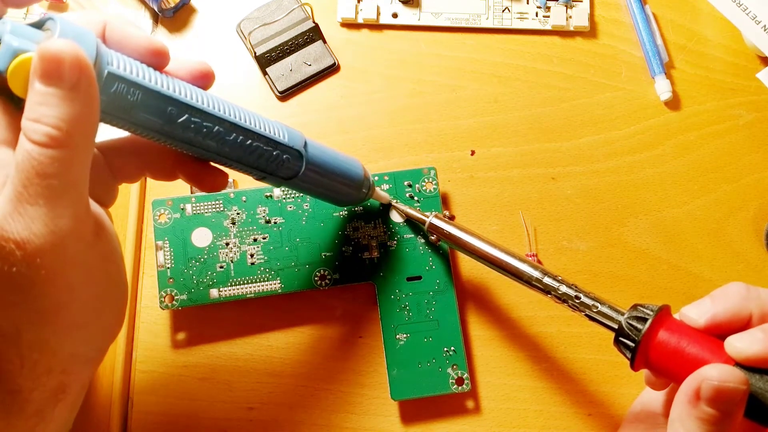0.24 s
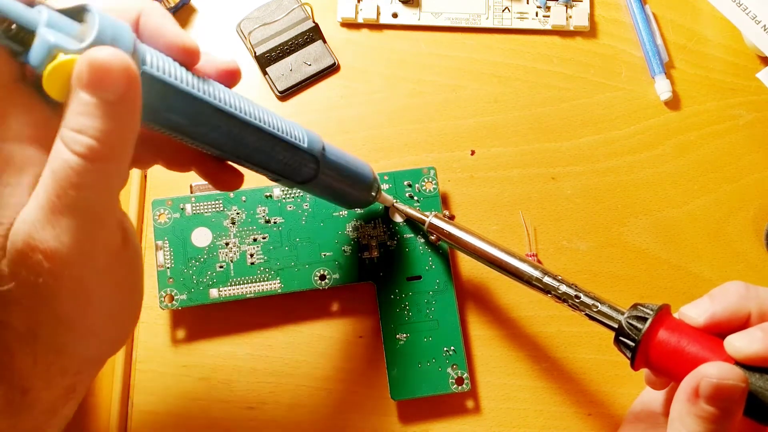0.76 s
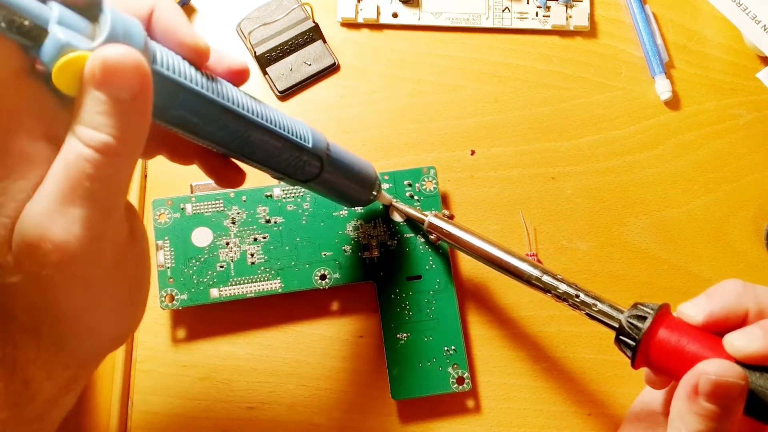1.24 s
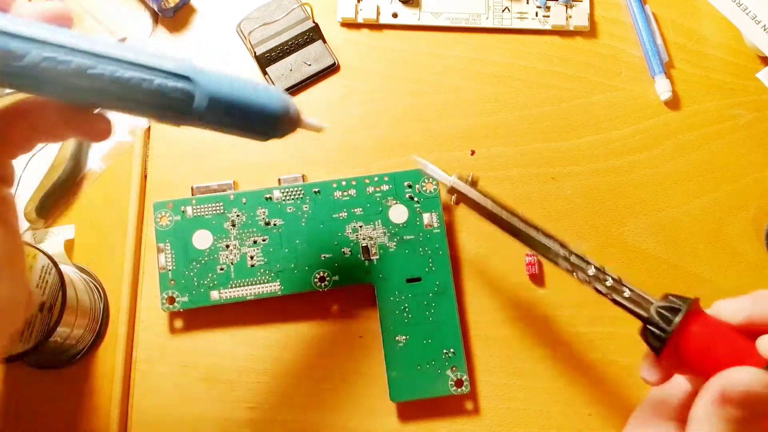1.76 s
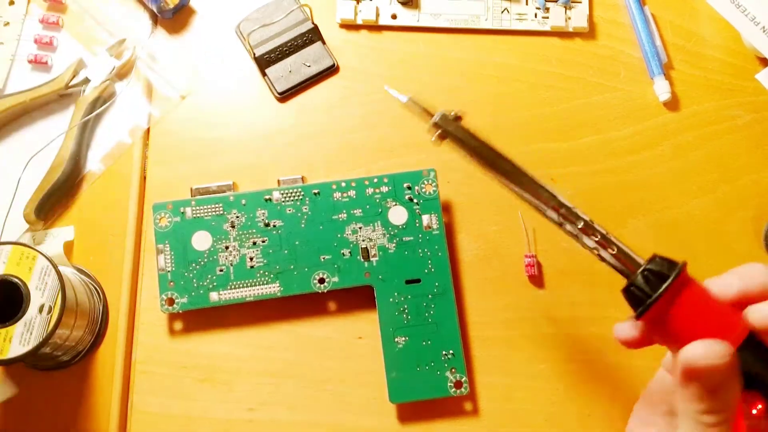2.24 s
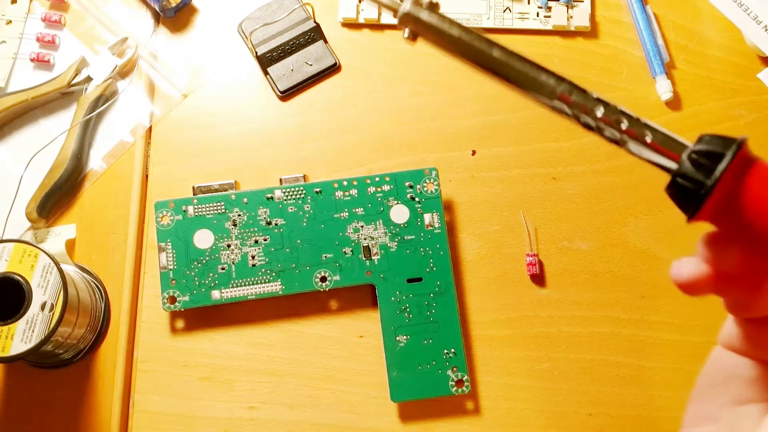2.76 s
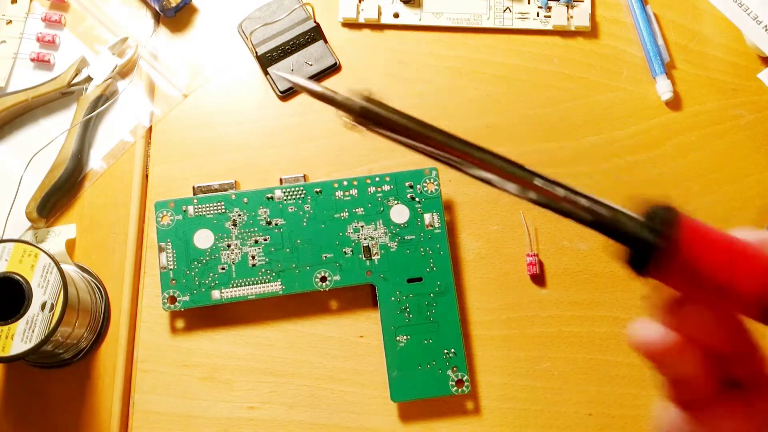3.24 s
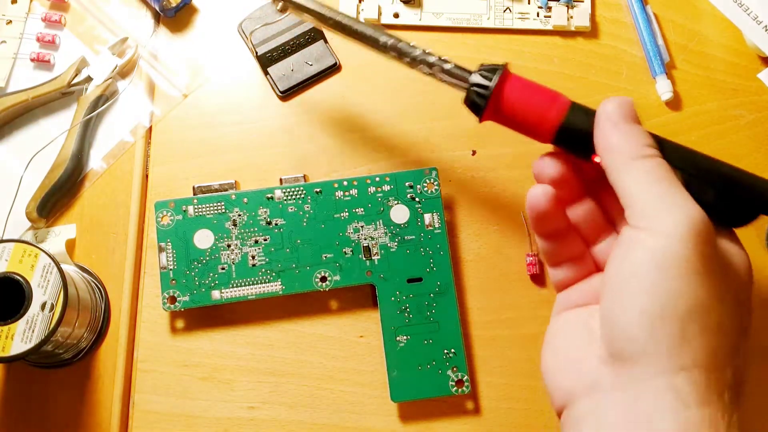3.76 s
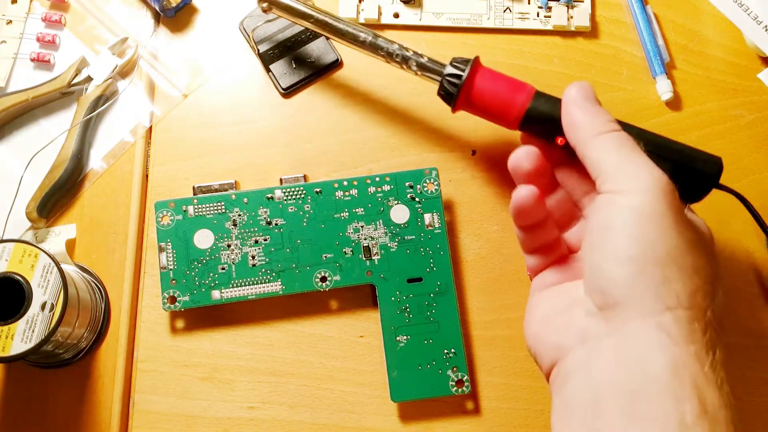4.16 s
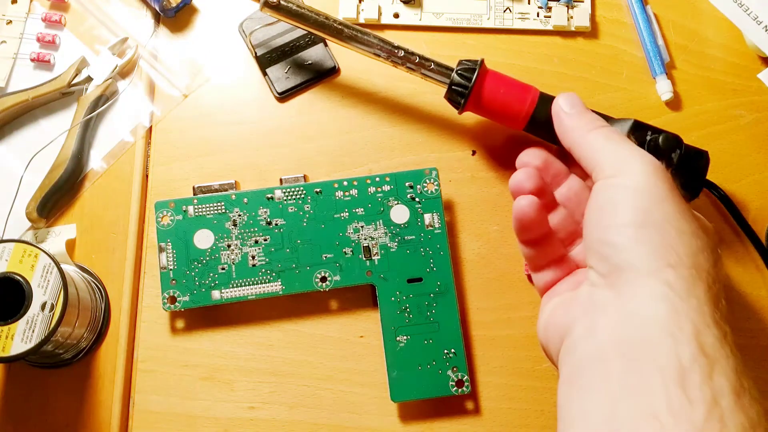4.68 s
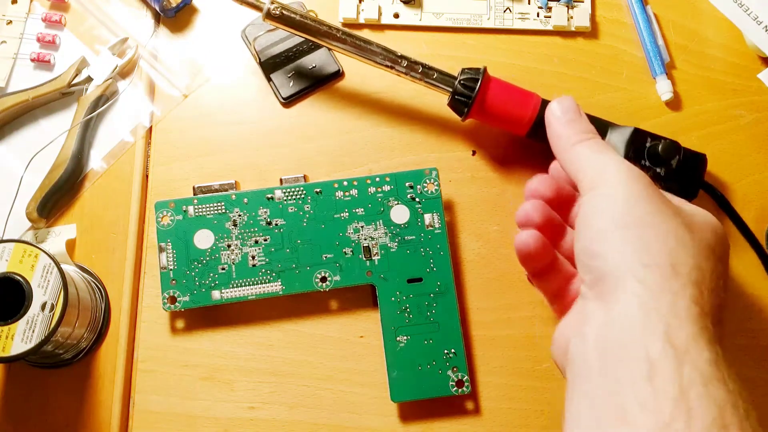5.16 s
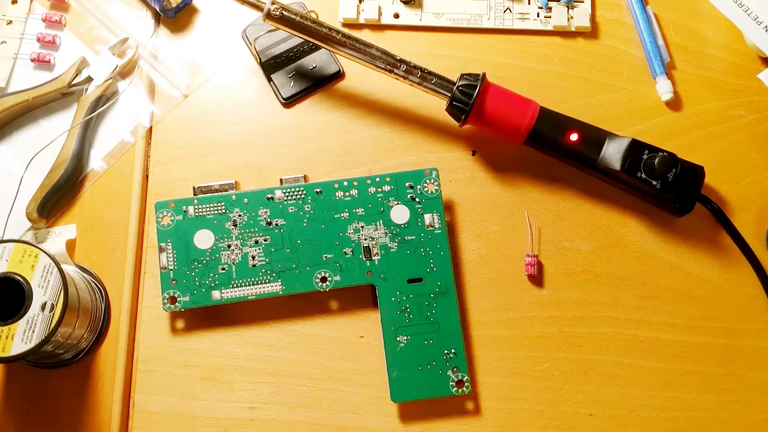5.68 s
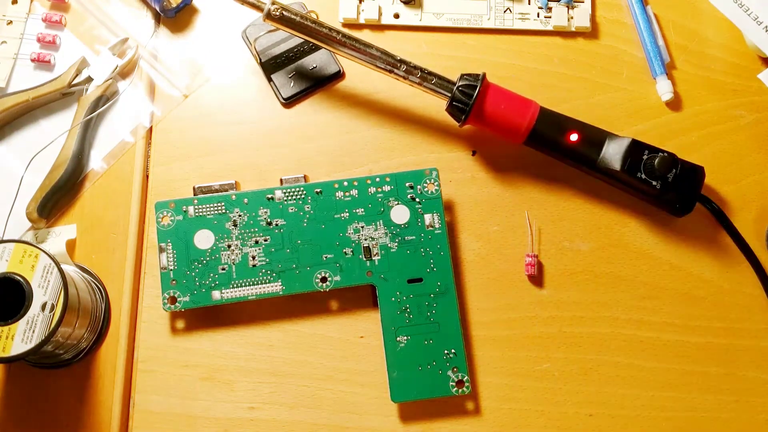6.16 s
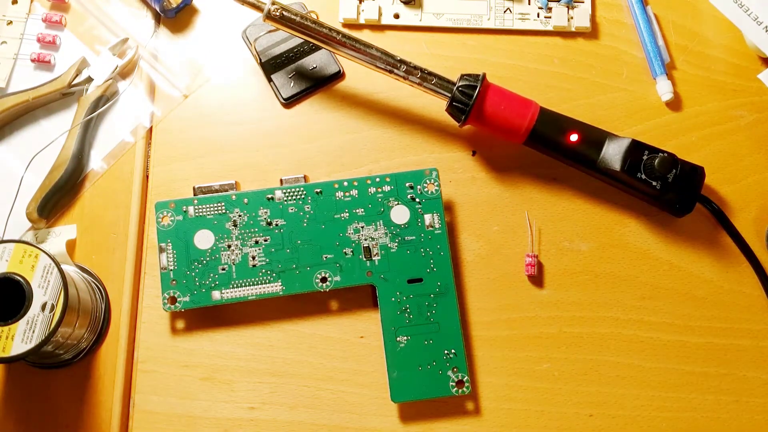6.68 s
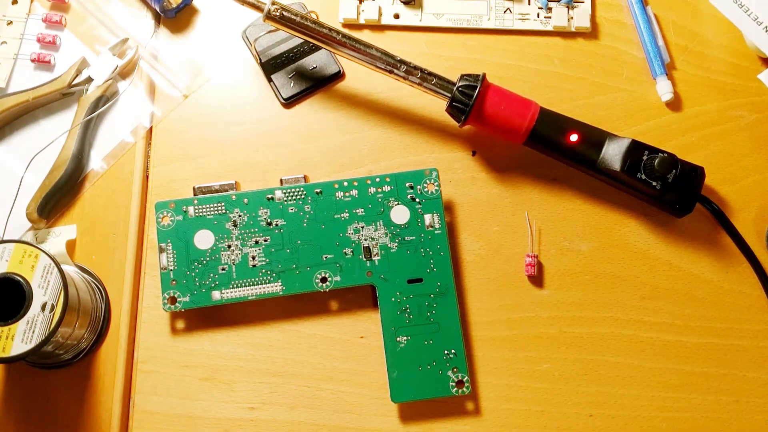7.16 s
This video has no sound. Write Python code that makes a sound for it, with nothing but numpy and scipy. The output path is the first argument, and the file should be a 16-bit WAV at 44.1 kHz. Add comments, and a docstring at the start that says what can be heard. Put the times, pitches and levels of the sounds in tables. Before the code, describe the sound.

Close, dry stereo pickup over a wooden workbench. First a bright double-edged clack from a solder pump, then thin board taps alternating in pitch and slowing to stillness. Faint rustle follows, then two metal clinks and a cluster of scraping knocks as an iron is laid down, ending with lower handle thuds. A lull, then uneven tool rummaging on the right and a piercing snap. Soft room hiss and a very high whine remain underneath.

```python
"""Over quiet room air with a thin whine, a solder pump clacks and a circuit board rocks to rest on a desk.
A soldering iron is then laid on its sheet-metal rest; to the right a hand shuffles tools and something snaps.
Blows are short noise rattles that ring the struck object and the wooden desk; sliding is dull and grainy noise.
The snap is a few dying sine waves. A short room tail follows, and two microphones above the desk hear it all."""
import sys
import numpy as np
from scipy import signal
from scipy.fft import rfft, irfft, next_fast_len
from scipy.io import wavfile
from scipy.ndimage import uniform_filter1d

SR = 44100
rng = np.random.default_rng(int(sys.argv[2]) if len(sys.argv) > 2 else 0)


def persist_wave(psi):
    """Save psi, clipped to +-1, as 16-bit WAV."""
    counts = np.round(np.clip(psi, -1, 1) * 32767).astype(np.int16)
    wavfile.write(sys.argv[1], SR, np.atleast_2d(counts).T)


N = 326781
BLOW = 6000  # samples a blow may last

# How the objects ring. Each row: pitch in Hz, strength in dB, time to die away by 60 dB in seconds.
BOARD_RING = [(800, -4, 0.12), (792, -4, 0.14), (925, -13, 0.1), (980, 2.5, 0.13), (1012, 1.5, 0.12),
              (1018, 4, 0.046), (1350, 5.5, 0.029), (1800, -8, 0.16), (1920, -5.5, 0.091), (2580, 6, 0.078),
              (3450, 1, 0.025)]
IRON_RING = [(774, -3, 0.0393), (1020, -9.5, 0.072), (1094, 7, 0.011), (1400, -7, 0.03), (1460, -4, 0.042),
             (1865, 10, 0.052), (2495, 16, 0.03), (2700, 5, 0.053), (3350, -11, 0.084), (5470, -10, 0.018),
             (7620, 9.5, 0.027)]
TOOL_RING = [(615, -2.5, 0.068), (700, 0, 0.052), (1048.5, 3, 0.14), (1413, -2.5, 0.2), (1740, -23, 0.052),
             (2740, -5.5, 0.082), (3330, 3, 0.03)]
DESK_RING = [(126.8, 0, 0.23), (218, -2, 0.24), (246.8, -5.5, 0.33), (283.8, -4.5, 0.16), (354, 7.5, 0.062),
             (397, 0.5, 0.17)]


def amp(db):
    """Turn dB into a gain."""
    return 10 ** (np.asarray(db) / 20)


def unit(x):
    """Scale to an rms level of 1."""
    return x / np.sqrt(np.mean(x ** 2))


def band(x, hz, width):
    """Keep a band around one pitch, like a resonance with gain 1 at its centre."""
    return signal.lfilter(*signal.iirpeak(hz, hz / width, fs=SR), x)


def wide_band(x, hz, width):
    """The same resonance twice over, which falls off more steeply on both sides."""
    return band(band(x, hz, width), hz, width)


def through(x, response):
    """Convolve along time."""
    return signal.oaconvolve(x, np.atleast_2d(response), axes=-1)[:, :N]


def fade_60db(t, t60):
    """Natural decay that loses 60 dB in t60 seconds."""
    return np.exp(-np.log(1000) * t / t60)


def walk(rate):
    """Smooth random wander with a spread of 1, taking about this many steps a second."""
    step = int(SR / rate)
    return unit(uniform_filter1d(np.repeat(rng.standard_normal(N // step + 1), step), step)[:N])


def sides(x, pan_db, lag):
    """Place a sound; from the right it reaches the left microphone lag samples late and duller."""
    far = np.roll(x, round(lag))
    if lag > 2:
        # the housing shades the far microphone above this many Hz
        far = signal.lfilter(*signal.butter(1, 11100, fs=SR), far)
    return np.array([far * amp(pan_db / 2), x * amp(-pan_db / 2)])


def bright(x):
    """Treble colour of cracks and rustle, made of overlapping resonances."""
    # Each row: centre in Hz, width in Hz, level in dB.
    crack_colour = [(4050, 940, 13.5), (5340, 5100, -1.5), (6810, 1650, 13), (9240, 2200, 6),
                    (12360, 2040, 4), (14460, 1100, -1)]
    out = 0
    for k, (hz, width, db) in enumerate(crack_colour):
        # neighbours alternate in sign so that they join smoothly
        out = out + (-1) ** k * amp(db) * wide_band(x, hz, width)
    return out


def ring(push, modes, gains_db, detune=1, damp=1):
    """A push sets off dying sine waves; detune shifts their pitch, damp shortens them; rms 1."""
    hz, db, t60 = np.transpose(modes)[:, :, None]
    hz = hz * detune
    t = np.arange(BLOW) / SR
    if len(push) == BLOW:
        # for a single blow, even out how strongly the random rattle drives each mode
        share = np.abs(np.sum(push * np.exp(-2j * np.pi * hz * t), axis=1, keepdims=True))
        gains_db = gains_db - 20 * np.log10(share / np.sqrt(np.sum(push ** 2)) + .3)
    waves = amp(db + gains_db) * np.sin(2 * np.pi * hz * t) * fade_60db(t, t60 * damp)
    return unit(signal.fftconvolve(push, np.sum(waves, axis=0))[:len(push)])


def blows(table, modes, touch, lag, detune=0.0085, far_db=-14.5):
    """Each contact is a dying rattle: a broad knock, the object's ring, the desk's thud and a crack."""
    out = np.zeros((2, N + BLOW))
    t = np.arange(BLOW) / SR
    rise_ms, contact_ms, ring_db, thud_db, pan_db, scatter_db = touch
    noises = rng.standard_normal((len(table), BLOW))
    for (start, db, crack_db, hz), noise in zip(table, noises):
        rise = np.minimum(1000 * t / rise_ms, 1)
        rattle = noise * np.exp(-1000 * t / np.clip(contact_ms, .3, 20)) * rise
        # the spot struck favours modes near its pitch; chance scatters their levels
        octaves = np.abs(np.log2(np.array(modes)[:, :1] / hz))
        spot_db = np.maximum(-22.0 * octaves, far_db) + 2.0 * noise[-len(modes):, None]
        tone = ring(rattle, modes, spot_db, detune=1 + detune * noise[1])
        thud = ring(rattle, DESK_RING, 2.1 * noise[-len(DESK_RING):, None])
        # every knock is pulled toward about 1100 Hz
        knock_hz = np.sqrt(hz * 1100)
        knock = wide_band(rattle, knock_hz, 2.56 * knock_hz)
        knock = unit(signal.lfilter(*signal.butter(2, 3.2 * knock_hz, fs=SR), knock))
        crack = unit(bright(rattle))
        sound = knock + amp(ring_db) * tone + amp(thud_db) * thud + amp(crack_db) * crack
        first = int(start * SR)
        out[:, first:first + BLOW] += amp(db) * sides(sound, pan_db + scatter_db * noise[0], lag)
    return out[:, :N]


# In every "touch" below: rise in ms, contact decay in ms (0.3 at least), ringing and desk thud in dB against
# the knock, left minus right in dB, random spread of that balance in dB.


def hush():
    """Room air and microphone hiss as coloured noise, slightly narrower in the bass, with a thin whine."""
    # Each row: pitch in Hz, relative level in dB per Hz.
    air_colour = [(15, -47), (25, 1), (55, -3.5), (114, 2.5), (313, -5), (496, -5.5), (1220, -12),
                  (2150, -21), (3150, -18.5), (5410, -16), (10400, -20), (12600, -20.5), (15200, -32),
                  (16500, -52)]
    # The background swells and sinks. Each row: time in seconds, level in dB.
    air_level = [(0, -65), (.55, -66.5), (1.5, -58), (2.898, -61.5), (4.6, -60), (5.4, -59), (6.6, -58),
                 (6.85, -65), (7.02, -70), (7.12, -73), (7.41, -77)]
    f = np.maximum(np.fft.rfftfreq(N, 1 / SR), 1)
    hz, db = np.transpose(air_colour)
    mid, side = rfft(rng.standard_normal((2, N))) * amp(np.interp(np.log(f), np.log(hz), db))
    side = side * np.minimum(0.76 + f / 3600.0, 1)
    # the left microphone hisses 1 dB more in the treble
    lean = amp(1 * np.clip(f / 2700.0, 0, 1) / 2)
    air = unit(irfft(np.array([(mid + side) * lean, (mid - side) / lean]), N))

    t = np.arange(N) / SR
    rise_hz_per_s, wander_hz, jitter_hz = 40, 60, 80
    whine_hz = 12350 + rise_hz_per_s * t + wander_hz * walk(7.0) + jitter_hz * walk(90.0)
    phase = np.cumsum(2 * np.pi * whine_hz / SR)
    # the two sides stand a quarter of a cycle apart
    whine = np.sin([[0], [np.pi / 2]] + phase) * amp(3.0 * walk(15.0))
    s, level_db = np.transpose(air_level)
    return (air + amp(-21) * whine) * amp(np.interp(t, s, level_db) + 1.5 * walk(11.0))


def pump():
    """The solder pump is triggered: sharp knocks with bright cracks ring its body."""
    # Each row: start in seconds, knock level in dB, crack in dB against the knock, favoured pitch in Hz.
    hits = [(0.263, -60.5, 13.5, 1390), (0.293, -97, -14, 1060), (0.313, -46, 6, 1400),
            (0.319, -46.5, 7, 1000), (0.331, -56.5, 1, 3150), (0.341, -60.5, 19.5, 2380)]
    # Each row: pitch in Hz, strength in dB, time to die away by 60 dB in seconds.
    pump_ring = [(680, -4, 0.057), (1060, 12, 0.0133), (1430, 25, 0.013), (1930, -10, 0.014),
                 (2870, 16, 0.011), (3200, 17, 0.0089), (3573, 23, 0.021)]
    touch = (1.3, 3, 3, -3, -6.5, 2)
    return blows(hits, pump_ring, touch, lag=15)


def swell(t, s, rise, fade):
    """Envelope of one stroke in dB: straight up to its loudest moment, straight down after."""
    edge_db = -20.0  # level at the start of the swell and the end of the fade
    return edge_db * np.maximum((s - t) / rise, (t - s) / fade)


def slide():
    """Friction: a dull, wavering low scrape, with uneven grains that ring the rubbed object and rustle."""
    # Hands and tools sliding. Each row: loudest moment in seconds, swell in seconds, fade in seconds,
    # dull scrape in dB, gritty middle in dB, bright rustle in dB.
    strokes = [(0.652, 0.041, 0.06, -57, -40, -68), (0.714, 0.011, 0.015, -72, -50, -79),
               (1.37, 0.071, 0.041, -67, -62, -61), (1.6, 0.14, 0.035, -75, -64.5, -64),
               (2.16, 0.066, 0.094, -73, -65, -95), (2.26, 0.29, 0.045, -71, -90, -62.5),
               (2.348, 0.038, 0.017, -80, -68, -58.5), (2.544, 0.12, 0.083, -79, -94, -60),
               (3.44, 0.026, 0.072, -43, -32, -64), (3.49, 0.039, 0.062, -69, -32.5, -53),
               (3.54, 0.044, 0.043, -63, -45, -60), (3.67, 0.15, 0.039, -60, -54, -65),
               (3.62, 0.61, 0.36, -52, -82, -81), (3.806, 0.063, 0.049, -49, -45, -57.5),
               (3.868, 0.11, 0.25, -50, -57, -61), (3.934, 0.022, 0.014, -40.5, -26.5, -42.5),
               (4.05, 0.022, 0.12, -84, -64, -61), (4.139, 0.027, 0.02, -41, -46, -45),
               (4.22, 0.052, 0.2, -57.5, -65, -86), (4.38, 0.12, 0.29, -79, -72, -72),
               (5.09, 0.11, 0.16, -69, -58, -59.5), (5.35, 0.029, 0.13, -61.5, -72, -65.5),
               (5.56, 0.054, 0.091, -59.5, -39.5, -42), (5.66, 0.031, 0.06, -76, -54.5, -56),
               (5.718, 0.018, 0.068, -45.5, -71, -83), (5.808, 0.025, 0.14, -46, -45, -40),
               (5.92, 0.091, 0.12, -55.5, -46.5, -57), (6.099, 0.017, 0.039, -42.5, -39, -69),
               (6.168, 0.021, 0.056, -46, -34, -44), (6.22, 0.093, 0.052, -47.5, -47, -55),
               (6.393, 0.01, 0.048, -44.5, -40, -34.5), (6.43, 0.05, 0.071, -49.5, -37, -46),
               (6.494, 0.008, 0.04, -54, -67, -43.5), (6.68, 0.41, 0.28, -58.5, -53, -53),
               (6.764, 0.049, 0.096, -56, -46, -35), (6.86, 0.047, 0.19, -79, -55.5, -60),
               (7.131, 0.062, 0.054, -44, -44.5, -57), (7.229, 0.042, 0.13, -62.5, -51.5, -43),
               (7.292, 0.034, 0.11, -57, -57.5, -59)]
    # What is rubbed: board, iron, tools. Each row: from and to in seconds, share of its free ring time,
    # ringing in dB against the broad grit.
    rubbed = [(0, 2.8, .8, 1), (2.8, 4.8, .55, -7), (4.8, 8, .7, -11)]
    # Strokes in which one resonance stands out. Each row: loudest moment in seconds, swell in seconds,
    # fade in seconds, level in dB, pitch in Hz, width in Hz.
    hums = [(3.769, 0.047, 0.071, -45, 1030, 200), (3.874, 0.025, 0.023, -44, 1130, 220),
            (4.2, 0.11, 0.093, -53, 630, 260), (4.36, .2, 0.15, -54.5, 527, 160),
            (4.4, 0.16, 0.08, -49.5, 151, 90), (5.57, 0.037, 0.26, -49, 844, 129),
            (5.719, 0.035, 0.023, -40.5, 950, 700), (6.11, 0.053, 0.049, -48.5, 1036, 110),
            (6.2, 0.084, 0.12, -47, 580, 347), (6.771, 0.12, 0.099, -42.5, 550, 114),
            (7.14, 0.11, 0.11, -58, 610, 355)]
    t = np.arange(N) / SR
    noise = rng.standard_normal((4, N))
    grain = np.minimum(rng.exponential(size=N // 60 + 1), 4).repeat(60)[:N]

    dull = wide_band(noise[0], 348, 360.0)
    dull = dull + 1.43 * band(noise[0], 232, 43.0) - 0.76 * band(noise[0], 441, 36.0)
    dull = unit(dull) * amp(2.75 * walk(45.0))

    grit = noise[1] * amp(2.7 * grain + 2.33 * walk(30))
    broad = unit(wide_band(grit, 1370, 2550.0))
    rung = 0
    for (begin, end, damp, db), modes in zip(rubbed, (BOARD_RING, IRON_RING, TOOL_RING)):
        rung = rung + amp(db) * ring(grit, modes, 0, damp=damp) * ((t >= begin) & (t < end))
    grit = (broad + rung) / np.sqrt(2)

    rustle = unit(bright(noise[2] * amp(1.44 * grain))) * amp(3.1 * walk(40))

    gains = np.zeros((3, N))
    for s, rise, fade, *levels_db in strokes:
        # three swell and fade lengths, down to -60 dB
        a, b = int((s - 3 * rise) * SR), int((s + 3 * fade) * SR)
        gains[:, a:b] += amp(np.array(levels_db)[:, None] + swell(t[a:b], s, rise, fade))
    rub = np.sum(gains * np.array([dull, grit, rustle]), axis=0)
    for s, rise, fade, db, hz, width in hums:
        rub = rub + unit(wide_band(noise[3], hz, width)) * amp(db + swell(t, s, rise, fade))
    right = t > 5.5  # the late handling is off to the right
    return sides(rub * ~right, 0, 0) + sides(rub * right, -3.0, 16)


def board():
    """The board chatters, then rocks to rest between a lower and a higher edge, ringing at each knock."""
    # Each row: start in seconds, knock level in dB, favoured pitch in Hz.
    knocks = [(0.618, -55.5, 1940), (0.624, -81, 1010), (0.637, -65, 1370), (0.648, -60, 1390),
              (0.663, -60, 980), (0.679, -67, 775), (0.709, -65, 920), (0.789, -71.5, 767),
              (0.832, -64, 960), (0.906, -74.5, 762), (0.94, -65, 1030), (1.004, -71.5, 762),
              (1.033, -67.5, 991), (1.08, -71.5, 770), (1.112, -68.5, 1000), (1.155, -74, 762),
              (1.177, -64, 1000), (1.229, -68, 990), (1.275, -72, 940), (1.316, -71, 970),
              (1.351, -75.5, 980), (1.385, -75, 930), (1.559, -79, 830)]
    touch = (3.5, 6.5, 8.5, -28, -0.5, 7)
    crack_db = -32  # against the knock
    rows = [(s, db, crack_db, hz) for s, db, hz in knocks]
    return blows(rows, BOARD_RING, touch, lag=0)


def desk_pushes():
    """Two quiet, very brief pushes ring the desk's low resonances."""
    # Each row: start in seconds, knock level in dB, crack in dB against the knock, favoured pitch in Hz.
    hits = [(2.044, -74.5, -40, 186), (5.703, -77, -22, 294)]
    touch = (14.5, -9, 20.5, -40, -1.5, 2)
    return blows(hits, DESK_RING, touch, lag=0, far_db=-30.0)


def clinks():
    """The iron taps its sheet-metal rest, which rings freely at steady pitches."""
    # Each row: start in seconds, knock level in dB, crack in dB against the knock, favoured pitch in Hz.
    taps = [(3.012, -43, -9, 4000), (3.223, -39, -7.5, 3200)]
    # Each row: pitch in Hz, strength in dB, time to die away by 60 dB in seconds.
    rest_ring = [(385, -10, .04), (813, -4, .03), (1346, -1, .018), (1771, -3, .025), (3260, -13, .1),
                 (5250, 0, .01), (5750, 7, .015), (7640, 2, .009)]
    touch = (2.25, 2.5, -1, -7, 0.2, 4)
    return blows(taps, rest_ring, touch, lag=1, detune=0)


def iron():
    """The iron knocks as it is laid on its rest: quick contacts that ring the metal."""
    # Each row: start in seconds, knock level in dB, crack in dB against the knock, favoured pitch in Hz.
    hits = [(3.257, -42.5, -15, 1000), (3.274, -54.5, 3, 1403), (3.429, -56, -8, 1400),
            (3.44, -57.5, -21, 1330), (3.446, -52, -21, 1475), (3.452, -57, -10, 1700),
            (3.459, -61, -9, 1500), (3.464, -56, -16, 1600), (3.47, -46, -5, 1800),
            (3.478, -46.5, -28, 1710), (3.487, -62, -15, 1510), (3.494, -47.5, -8, 1810),
            (3.532, -50, -11, 1010), (3.583, -49.5, -11.5, 2620), (3.646, -56, -22, 2460),
            (3.685, -55.5, -19, 1060), (3.789, -53.5, -15, 1850), (3.797, -50, -28, 1060),
            (3.805, -52, -16, 2580), (3.872, -72, -14, 1130), (3.904, -49, -22, 1040),
            (3.918, -46.5, -31, 1380), (3.929, -45.5, -2.5, 1910)]
    touch = (0.6, 2.5, -3.5, -3.5, -2.5, 3)
    return blows(hits, IRON_RING, touch, lag=1)


def handle():
    """The handle knocks in very brief, lower-pitched contacts."""
    # Each row: start in seconds, knock level in dB, crack in dB against the knock, favoured pitch in Hz.
    hits = [(4.085, -39.5, -29, 790), (4.094, -43, -7, 925), (4.141, -55.5, -4.5, 565)]
    # Each row: pitch in Hz, strength in dB, time to die away by 60 dB in seconds.
    handle_ring = [(407, -47, 0.048), (582, -2, 0.2), (700, -1.5, 0.039), (940, -5.5, 0.027),
                   (1040, -12, 0.04), (1280, 8, 0.013), (1330, 2, 0.015), (1580, -32, 0.0214),
                   (2830, -3.5, 0.016), (3580, 7, 0.016)]
    touch = (14, 0.5, 0.5, -13.5, 2, 11)
    return blows(hits, handle_ring, touch, lag=0)


def tools():
    """Shuffled tools knock and ring off to the right, reaching the left microphone late."""
    # Each row: start in seconds, knock level in dB, crack in dB against the knock, favoured pitch in Hz.
    hits = [(5.483, -65.5, 12, 2480), (5.54, -50.5, 7, 1050), (5.783, -43.5, 0, 1040),
            (5.795, -48.5, -13, 1010), (5.842, -43, 2.5, 2830), (5.884, -43.5, 5.5, 553),
            (6.079, -71, -15, 2700), (6.096, -62, -2, 390), (6.105, -67.5, 12, 439), (6.149, -59, 0, 406),
            (6.161, -54, 4, 410), (6.194, -51, -12.5, 600), (6.245, -61, 3, 401), (6.389, -49.5, -10, 2740),
            (6.415, -46, 2, 825), (6.492, -54.5, -1, 2840), (6.732, -62, 13, 455), (6.755, -74, 8, 500),
            (6.772, -59.5, -9, 579), (6.82, -52, 4, 565), (6.83, -49, 8, 1550), (7.057, -59.5, 3.5, 595),
            (7.066, -59, -12, 600), (7.105, -58.5, -25, 500), (7.13, -62, -29, 604), (7.145, -59, -22, 500),
            (7.395, -64, -31, 582)]
    touch = (3.5, 4, -2, -16, -5.5, 2)
    return blows(hits, TOOL_RING, touch, lag=16)


def snap():
    """A sharp click near the right microphone: a tiny stiff part pings in quickly dying sine waves."""
    # Level in dB, left minus right in dB.
    db, pan_db = (-6.5, -13)
    # Each row: pitch in Hz, strength in dB, time to die away by 60 dB in seconds.
    snap_ring = [(5170, -10, 0.0035), (9750, -7, 0.0027), (12050, -8, 0.0048), (12300, -21, 0.036)]
    t = np.maximum(np.arange(N) / SR - 6.8322, 0)  # seconds since the snap
    ping = sum(amp(g_db) * np.sin(2 * np.pi * hz * t) * fade_60db(t, t60) for hz, g_db, t60 in snap_ring)
    return amp(db) * sides(ping, pan_db, 16)


def room(x):
    """Diffuse tail of dying noise, mostly unrelated left and right, duller than the direct sound."""
    t60_s, level_db, treble_db = 0.21, -3, -3
    shared_hz = 800  # below this the tail is much the same on both sides
    t = np.arange(SR // 2) / SR
    tail = rng.standard_normal((2, len(t))) * fade_60db(t, t60_s) * np.minimum(t / 0.0016, 1)
    low = signal.lfilter(*signal.butter(1, 2500, fs=SR), tail)
    tail = low + amp(treble_db) * (tail - low)
    tail = tail - 0.67 * signal.lfilter(*signal.butter(1, shared_hz, fs=SR), tail - tail[0])
    tail = tail / np.sqrt(np.sum(tail ** 2) / 2)
    return amp(level_db) * through(x.mean(axis=0, keepdims=True), tail)


def scene():
    """Everything on the desk, its room tail and the background."""
    direct = pump() + slide() + board() + desk_pushes() + clinks() + iron() + handle() + tools() + snap()
    desk = direct + room(direct)
    # thin out the deep bass of blows and sliding
    bass_cut = signal.butter(3, 95, "high", fs=SR, output="sos")
    return signal.sosfilt(bass_cut, desk) + hush()


def record(dry):
    """Widen the stereo image: each side subtracts a late copy of the other; colour it and cut the top."""
    # Each row: pitch in Hz, share of the copy from 0 to 1, microphone colour in dB.
    widening = [(39.7, 0.7, 1.5), (292, 0.35, 0), (1030, 0.7, -4), (2180, 0.69, -1), (4400, 0.5, -5),
                (6100, 0.35, -2.5), (9400, 0, 0.5), (16000, 0.6, 3.5)]
    lag_s, top_hz = 0.000455, 16300
    size = next_fast_len(N + 4096)
    f = np.maximum(np.fft.rfftfreq(size, 1 / SR), 1)
    hz, share, db = np.transpose(widening)
    copy = np.interp(np.log(f), np.log(hz), share) * np.exp(-2j * np.pi * f * lag_s)
    colour = amp(np.interp(np.log(f), np.log(hz), db))
    both = rfft(dry, size)
    wide = irfft((both - copy * both[::-1]) * colour, size)[:, :N]
    return signal.sosfilt(signal.ellip(10, .2, 70, top_hz, fs=SR, output="sos"), wide)


dry = scene()
out = record(dry)
persist_wave(out)
```